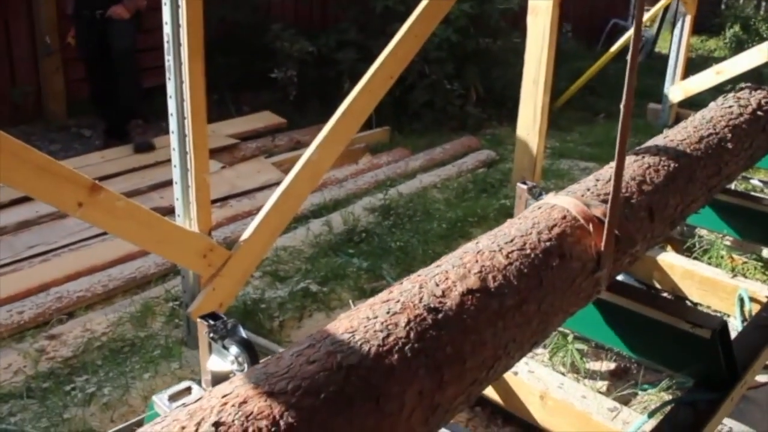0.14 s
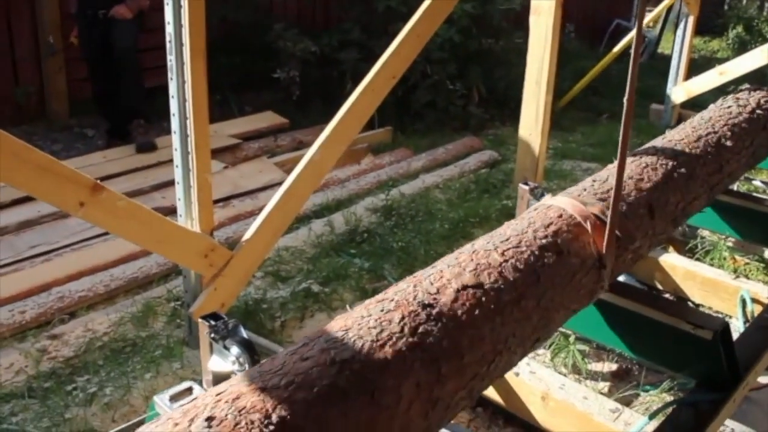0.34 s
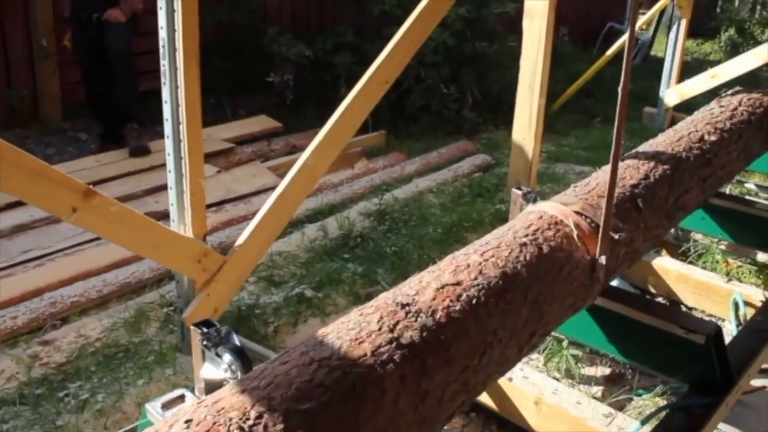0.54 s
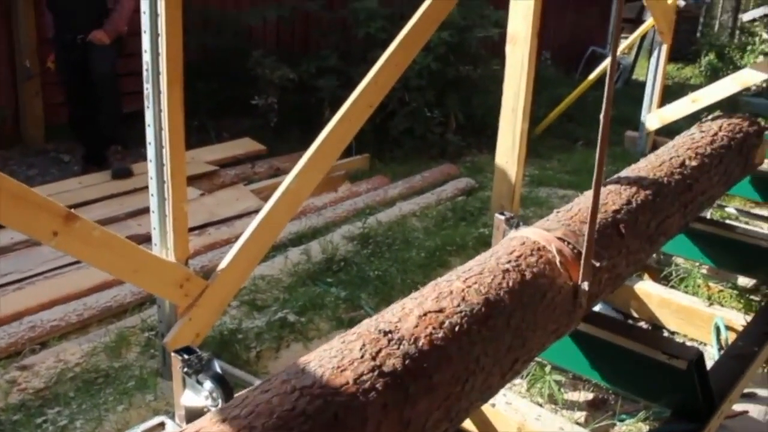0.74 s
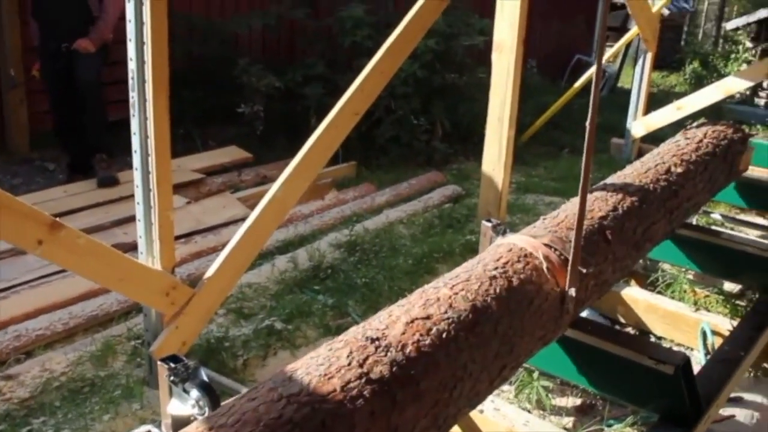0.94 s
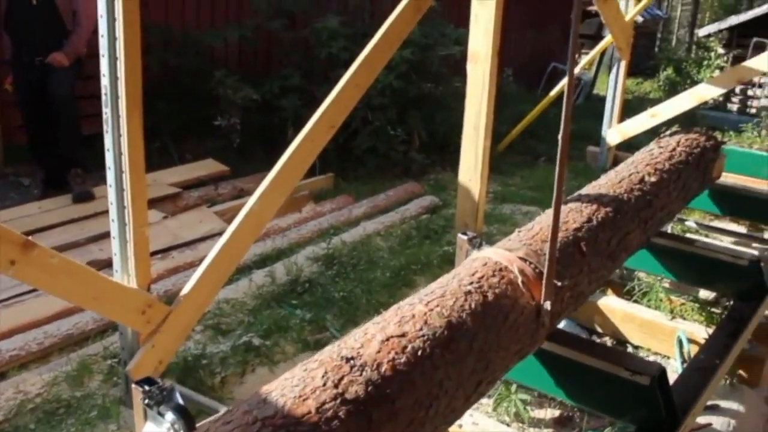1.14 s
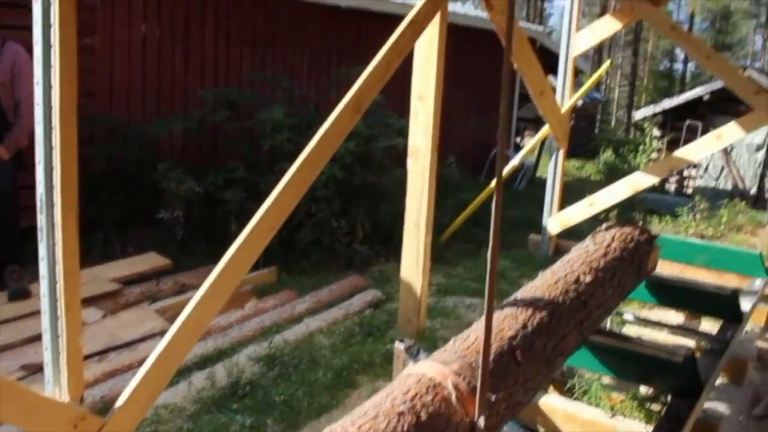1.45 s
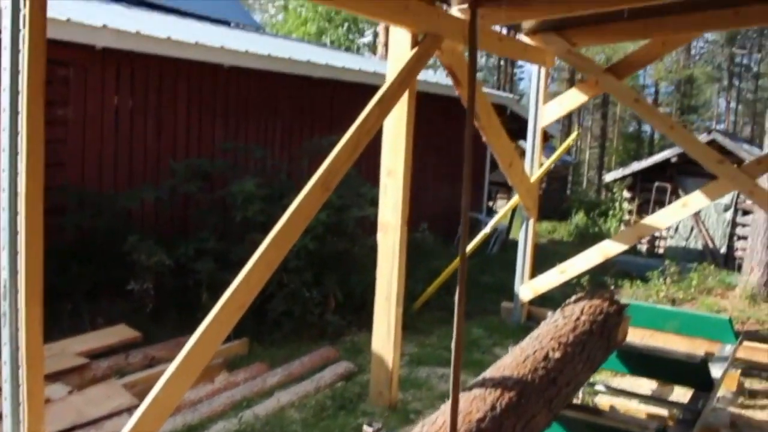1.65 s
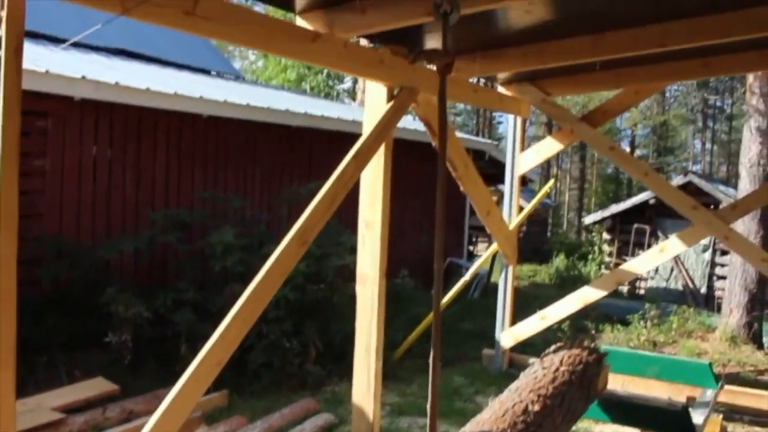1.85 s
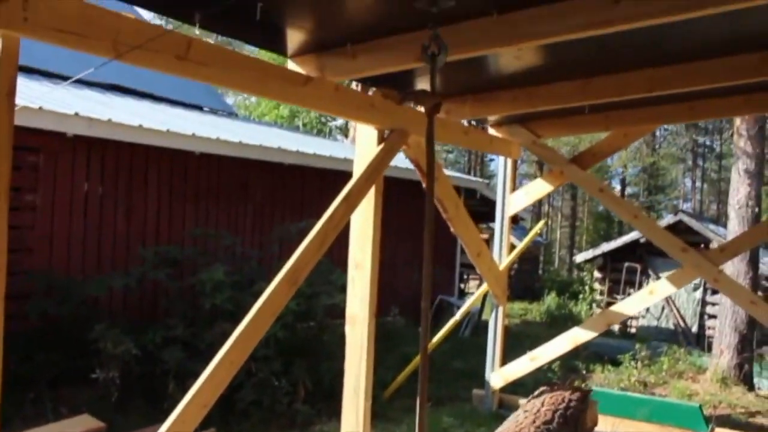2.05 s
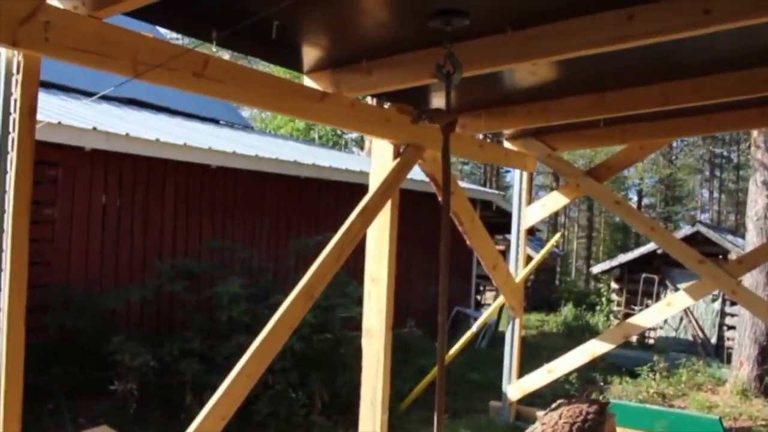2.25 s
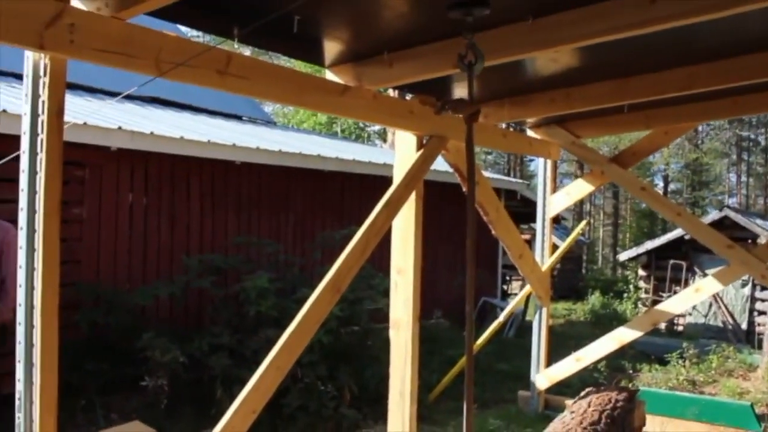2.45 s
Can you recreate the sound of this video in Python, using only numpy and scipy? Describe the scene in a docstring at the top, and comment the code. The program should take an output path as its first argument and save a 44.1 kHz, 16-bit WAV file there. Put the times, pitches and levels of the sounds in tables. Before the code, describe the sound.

Electric winch runs twice briefly, clunking on and whirring roughly, with a quiet outdoor pause between

```python
"""Under a timber roof in quiet outdoor air, an electric winch runs two short bursts.
Relay and brake clacks are bursts of noise; the cable snapping tight thumps the frame, as fading sine tones.
Gear whirr, rattle, growl and groan are streams of tiny random impacts ringing in metal and timber.
Gears and cable squeal in gliding tones, the drum settles under the brake, and deep tones ring on.
The roof answers with a fading noise echo, and shaped noise makes the hush of the air."""
import sys
import numpy as np
from scipy import signal
from scipy.fft import rfft, irfft, next_fast_len
from scipy.io import wavfile
from scipy.ndimage import uniform_filter1d, map_coordinates

SR = 44100
rng = np.random.default_rng(int(sys.argv[2]) if len(sys.argv) > 2 else 0)


def to_linear_factor(level_db):
    """Convert decibel levels (scalar or array-like) to linear amplitude factors."""
    exponent = np.asarray(level_db, float) / 20
    return 10 ** exponent


def unload_wav(signal):
    """Save mono or channel-first audio to the path in sys.argv[1] as 16-bit WAV at rate SR, clipped to [-1, 1]."""
    wavfile.write(
        sys.argv[1],
        SR,
        np.round(np.clip(np.atleast_2d(signal).T, -1, 1) * 32767).astype(np.int16),
    )


N = 112455  # length in samples
# In every table, fade_s is the time a sound takes to drop by 60 dB.


def unit(x):
    """Scale to an rms of 1."""
    return x / np.sqrt(np.mean(x ** 2) + 1e-20)


def along(points, hz):
    """Read a curve of (pitch_hz, value) points on a logarithmic pitch axis."""
    point_hz, value = np.transpose(points)
    return np.interp(np.log(hz + 1), np.log(point_hz + 1), value)


def filtered(x, response):
    """Shape the spectrum of x by a response, a function of frequency in Hz."""
    size = next_fast_len(x.shape[-1] + 8192)  # spare room lets resonances ring out
    spectrum = rfft(x, size) * response(np.fft.rfftfreq(size, 1 / SR))
    return irfft(spectrum, size)[..., :x.shape[-1]]


def wobble(rate):
    """A smooth random curve through a given number of random points a second."""
    points = rng.standard_normal(int(N * rate / SR) + 4)
    return map_coordinates(points, [np.arange(N) * rate / SR])


def patchy(x, depth_db):
    """Bands of a few hundred Hz flare and fade within some 20 ms; rms 1."""
    grid = signal.stft(x, nperseg=512, noverlap=384)[2]
    field = uniform_filter1d(rng.standard_normal(grid.shape), size=3, axis=0)  # smooth over pitch
    field = uniform_filter1d(field, size=7, axis=1)  # smooth over time
    flaring = grid * to_linear_factor(depth_db * unit(field))
    return unit(signal.istft(flaring, nperseg=512, noverlap=384)[1][:N])


def contacts(rate, spread_db, spectrum, modes, modes_db):
    """Random little impacts, coloured broadly and ringing in a set of resonances; rms 1."""
    struck = rng.random(N) < rate / SR  # on average this many a second
    hits = struck * to_linear_factor(spread_db * rng.standard_normal(N)) * rng.standard_normal(N)

    def response(f):
        """Broad colour, with resonant peaks of alternating sign added in."""
        peaks = 0
        for k, (hz, width, db) in enumerate(modes):
            peaks = peaks + (-1) ** k * to_linear_factor(db) * 1j * f * width / (hz * hz - f * f + 1j * f * width)
        return to_linear_factor(along(spectrum, f)) * (1 + to_linear_factor(modes_db) * peaks)

    return unit(filtered(hits, response))


def ringing(modes, seconds, tilt_db=0, lasting=1):
    """One blow makes each mode ring and fade; neighbours start in opposite directions."""
    t = np.arange(int(seconds * SR)) / SR
    tones = 0
    for k, (hz, db, fade) in enumerate(modes):
        level_db = db + tilt_db * np.log2(hz / 400) - 60 * t / (fade * lasting)
        tones = tones + (-1) ** k * to_linear_factor(level_db) * np.sin(2 * np.pi * hz * t)
    blow_rise_s = 0.00054  # time constant of the onset
    return (1 - np.exp(-t / blow_rise_s)) * tones


def add(track, s, sound):
    """Mix a sound into a track at a time in seconds, cut at the track's end."""
    part = track[round(s * SR):][:len(sound)]
    part += sound[:len(part)]


# How alike the air is in the two ears: pitch_hz, likeness (1 same, 0 unrelated, -1 opposite)
AIR_LIKENESS = [(60, -0.21), (180, 0.67), (550, 0.46), (1650, 0.048), (4970, 0.14), (15000, -0.26)]
# Colour of the air: pitch_hz, relative level_db
AIR_COLOUR = [(12, -40), (25, -2.5), (60, -3.5), (130, -15), (200, -10.5), (300, -8.5), (420, -12.5),
              (700, -15), (1400, -18), (5000, -25.5), (10000, -37.5), (14500, -40.5), (15600, -42),
              (15800, -93)]
# Swell of the air: time_s, level_db before the 2 dB added below
AIR_LEVEL = [(0, -49.5), (.2, -48.5), (.5, -43.5), (.62, -56), (.75, -50.5), (1.2, -49), (1.9, -51),
             (2.4, -48.5), (2.55, -50)]


def air():
    """Far outdoor hush: coloured noise, more or less alike in the two ears by pitch."""
    def mid_and_side(f):
        """Share the noise between the ears' common part and their difference."""
        turn = np.arccos(np.clip(along(AIR_LIKENESS, f), -1, 1)) / 2
        return to_linear_factor(along(AIR_COLOUR, f)) * [np.cos(turn), np.sin(turn)]

    mid, side = filtered(rng.standard_normal((2, N)), mid_and_side)
    s, db = np.transpose(AIR_LEVEL)
    level_db = np.interp(np.arange(N) / SR, s, db) + 2
    return to_linear_factor(level_db) * unit(np.array([mid + side, mid - side]))


# Deep tones of taut cable and posts: pitch_hz, loaded_db, rest_db (relative levels)
HUM_LINES = [(83.5, -10, -1.5), (100, -10.5, -5), (130.4, -7.5, -2), (163, -6.5, -30), (165.4, -39, -4.5)]
# Level of all the deep tones together: time_s, level_db
HUM_LEVEL = [(0.262, -16), (0.28, -32), (0.38, -21), (0.4, -20), (0.5, -37), (0.54, -71), (0.65, -49.5),
             (0.69, -45.5), (0.91, -49), (1.34, -47.5), (1.86, -52), (1.87, -55), (1.96, -45),
             (1.969, -18.5), (1.99, -25.5), (2.08, -23), (2.12, -34), (2.17, -28), (2.33, -30), (2.36, -55),
             (2.39, -40), (2.55, -37.5)]


def hum():
    """Deep steady-pitched lines, whose balance shifts when the cable is loaded and they grow loud."""
    t = np.arange(N) / SR
    s, db = np.transpose(HUM_LEVEL)
    level_db = np.interp(t, s, db, left=-120)
    loaded_over_db = -44  # at this level the balance is halfway
    load = np.clip((level_db - loaded_over_db) / 6 + .5, 0, 1)
    lines = np.zeros(N)
    for hz, loaded_db, rest_db in HUM_LINES:
        balance = load * to_linear_factor(loaded_db) + (1 - load) * to_linear_factor(rest_db)
        tone = np.sin(2 * np.pi * (hz * t + rng.random()))
        lines += balance * to_linear_factor(1.5 * wobble(7.12)) * tone
    return to_linear_factor(level_db) * lines


# Echo of the roof and sheds: pitch_hz, fade_s
ROOF_FADE = [(150, 0.23), (1500, .35), (8000, 0.15)]


def roof(x):
    """The roof and sheds answer with a fading wash, different in each ear, highs and lows fading apart."""
    hz, t, grid = signal.stft(rng.standard_normal((2, SR // 2)), SR, nperseg=256)
    fading = grid * to_linear_factor(-60 * t / along(ROOF_FADE, hz)[:, None])
    tail = signal.istft(fading, SR, nperseg=256)[1]
    late = np.pad(x, (300, 0))[None]  # samples of delay
    return signal.fftconvolve(late, tail / np.linalg.norm(tail[0]), axes=1)[:, :N]


# Difference between the ears: pitch_hz, level_db before the 3 dB added below
WINCH_WIDTH = [(60, -12), (150, -9), (380, -16), (950, -11.5), (2380, -8), (5980, -3), (15000, 4)]


def spread(x):
    """The wide machine reaches the two ears by different short paths, from parts that keep shifting."""
    n = np.arange(1500)
    paths = rng.standard_normal(1500) * to_linear_factor(-60 * n / 1500)
    moved = signal.fftconvolve(x, paths / np.linalg.norm(paths))[:N]
    shifting = .55  # share of the difference that wavers
    moved = moved * (1 - shifting + shifting * wobble(110))
    side = filtered(moved, lambda f: to_linear_factor(along(WINCH_WIDTH, f) + 3.0))
    return np.array([x + side, x - side])


# Drum settling when the brake grips: start_s, rise_s, grip_s (from the start until fading begins)
DRUM_SETTLE = (2.2265, 0.0075, 0.039)
# Modes of the drum: pitch_hz, level_db (wavers), fade_s
DRUM_MODES = [(240.4, -30, 0.21), (495, -28, 0.15), (644, -22.5, 0.085), (892.6, -28, .25),
              (1000, -31, .06), (1310, -32, 0.05), (1590, -36, .2), (2210, -44, 0.14), (2894, -40, .06),
              (4260, -35, .08), (4650, -41.5, .06)]


def settle():
    """The brake judders on the drum, whose modes waver in level and phase and die away after the grip."""
    start, rise, grip = DRUM_SETTLE
    out = np.zeros(N)
    t = np.arange(SR // 3) / SR
    judder_rad = 1.3
    for hz, db, fade in DRUM_MODES:
        level_db = db + 3 * wobble(90)[:len(t)] - 60 * np.clip(t - grip, 0, 1) / fade
        phase = 2 * np.pi * hz * t + judder_rad * wobble(90)[:len(t)]
        add(out, start, to_linear_factor(level_db) * np.clip(t / rise, 0, 1) * np.sin(phase))
    return out


# Start of each squeal: start_s
SQUEAL_STARTS = [.425, .44, .47, .47, .475, .505, .51, .52, .535, .56, 2.038, 2.038, 2.04, 2.07, 2.075,
                 2.08, 2.1]
# Brief rough squeals of gears and cable: length_s, first_hz, last_hz, level_db (pitch and level waver)
SQUEAL_GLIDES = [(0.032, 3900, 3640, -31), (.04, 5500, 5300, -26), (0.048, 2913, 3033, -20.5),
                 (0.023, 3730, 4900, -34), (0.052, 5900, 6700, -27), (0.013, 513, 530, -25.5),
                 (0.096, 4330, 4500, -28), (0.075, 2900, 3010, -25), (0.048, 5800, 5400, -25.5),
                 (0.079, 780, 790, -24), (.03, 2800, 2760, -33), (0.027, 4200, 4500, -32),
                 (0.035, 4420, 4800, -29.5), (.04, 3800, 3830, -29), (0.037, 1500, 1950, -25.5),
                 (0.082, 2700, 2600, -27.5), (0.028, 5400, 6160, -31)]


def squeals():
    """Gears and cable squeal: gliding tones of wavering pitch and level that swell and fade."""
    out = np.zeros(N)
    jitter, flutter_db = .015, 4  # share of the pitch, dB
    for start, (length, first_hz, last_hz, db) in zip(SQUEAL_STARTS, SQUEAL_GLIDES):
        u = np.linspace(0, 1, round(length * SR))
        hz = first_hz + (last_hz - first_hz) * u
        hz = hz * (1 + jitter * wobble(506)[:len(u)])
        level = to_linear_factor(db + flutter_db * wobble(200)[:len(u)])
        swell = np.sin(np.pi * u) ** .5
        add(out, start, level * swell * np.sin(2 * np.pi * np.cumsum(hz) / SR))
    return out


# Relay and brake clacks: start_s, level_db (before the envelope), hold_s (until fading begins),
# fade_s, tilt in dB per octave
CLACK_HITS = [(.2, -15, 0.0073, 0.15, .5), (0.2108, -13, 0.0014, 0.026, 1), (.256, -9, 0.003, 0.049, -5),
              (.935, -44, 0.0086, 0.082, -3), (1.924, -29, 0.0015, .05, -8.5),
              (1.93, -12.5, 0.0048, 0.13, 0), (1.936, -15, 0.0018, 0.054, 2),
              (1.974, -15.5, .008, 0.039, 2), (2.2258, -15, .0015, 0.051, -1.5)]
# Colour all clacks share before their tilt: pitch_hz, relative level_db
CLACK_COLOUR = [(88, -52), (150, -34), (239, -13), (1090, -8), (1240, -2.5), (2230, -9.5), (5130, -14),
                (11800, -41.5), (13300, -63.5), (15500, -50)]


def clacks():
    """Metal parts strike: short gritty noise bursts that start abruptly, swell briefly and fade."""
    out = np.zeros(N)
    t = np.arange(SR // 4) / SR
    for start, db, hold, fade, tilt in CLACK_HITS:
        grit = rng.standard_normal(len(t)) * to_linear_factor(2 * rng.standard_normal(len(t)))
        colour = lambda f: to_linear_factor(along(CLACK_COLOUR, f) + tilt * np.log2((f + 50) / 2000))
        grit = unit(filtered(grit, colour))
        swell = np.clip(0.43 + 0.28 * t / hold, 0, 1)
        add(out, start, to_linear_factor(db) * grit * swell * to_linear_factor(-60 * np.clip(t - hold, 0, 1) / fade))
    return out


# Moments when the cable snaps tight: start_s
SNAP_STARTS = [.2541, .2562, .2608, 1.9876]
# Each snap: level_db, tilt in dB per octave, ring length as a factor on the frame's fade_s
SNAP_BLOWS = [(-13, 2.5, 0.82), (-18, -3, 0.63), (-22, 1.5, .8), (-10, 1, 0.53)]
# Modes of the timber frame: pitch_hz, relative level_db, fade_s (before that factor)
FRAME_MODES = [(124, -21, 0.6), (154.8, -5.5, 0.44), (252.7, -7.5, 0.17), (423, -3, 0.13),
               (520, -1.5, 0.094), (770, 1.5, 0.052), (1056, 2, 0.059), (1330, -13.5, .1),
               (1566, -1, 0.053), (1740, -9.5, 0.1), (2045, -8, 0.1)]
# The cable's own twang: start_s, pitch_hz, level_db
CABLE_TWANGS = [(.2541, 426.6, -8), (1.9873, 498, -4)]


def snaps():
    """The cable jerks tight, twangs on a single tone and knocks the frame's modes into ringing."""
    out = np.zeros(N)
    for start, (db, tilt_db, lasting) in zip(SNAP_STARTS, SNAP_BLOWS):
        add(out, start, to_linear_factor(db) * ringing(FRAME_MODES, .4, tilt_db, lasting))
    twang_fade_s = .12
    for start, hz, db in CABLE_TWANGS:
        add(out, start, ringing([(hz, db, twang_fade_s)], .3))
    return out


# Motor levels, a list of rows per burst: time_s, whirr_db, fizz_db (over the whirr), rattle_db,
# growl_db, groan_db
MOTOR_BURSTS = [
    [(0.27, -45, -22, -16, -19, -7.5), (0.296, -59, -35, -34, -31, -21.5),
     (0.368, -46, -12, -28.5, -30, -21.5), (0.382, -48, 4, -22.5, -21.5, -29),
     (0.416, -41, -16, -26.5, -33.5, -23.5), (0.43, -24, -9, -30, -28, -33),
     (0.44, -28.5, -5, -22, -29, -24.5), (0.48, -15.5, -14, -30.5, -33.5, -32),
     (0.522, -18, -16, -24.5, -25, -42), (0.552, -20, -16, -26.5, -31.5, -47),
     (0.58, -19.5, -17.5, -24.5, -27.5, -38), (0.61, -32.5, -11, -31.5, -30.5, -40),
     (0.648, -39.5, -18.5, -37.5, -31.5, -35), (0.82, -54.5, -25, -52, -56.5, -51),
     (0.922, -64, -22, -56.5, -53, -53.5), (0.94, -49, -34, -56, -53, -57), (0.97, -66, -5, -50, -50, -51),
     (1.05, -63, -12, -65, -60, -54)],
    [(2.0, -35, 0, -16, -12.5, -14), (2.032, -67, -23, -43, -32.5, -26), (2.046, -27, -11, -36, -34, -22),
     (2.066, -22.5, -14, -29, -33, -28), (2.092, -18.5, -15, -27.5, -38.5, -36),
     (2.14, -26.5, -14, -35, -43, -42), (2.154, -28.5, -15.5, -49, -41, -38.5),
     (2.218, -47.5, -22, -46, -50, -42), (2.228, -29.5, -17, -28, -35, -36),
     (2.236, -28, -5.5, -28, -21, -30), (2.26, -37.5, -11, -32, -25.5, -25.5),
     (2.29, -42.5, -17, -47, -40.5, -39.5), (2.348, -53.5, -24, -48, -46.5, -46.5),
     (2.502, -59.5, -16, -57, -53.5, -47), (2.55, -60, -20, -54, -61, -58)],
]
# Colours of the sounds: pitch_hz, relative level_db
WHIRR_COLOUR = [(880, -20.5), (1500, -8), (2000, -5), (2950, -0.5), (4400, -3.5), (5600, -6), (6600, -10.5),
                (7200, -19), (9100, -29), (15400, -120)]
FIZZ_COLOUR = [(4120, -30), (7000, -1), (11500, -7.5), (14600, -23), (15300, -40), (15500, -75)]
RATTLE_COLOUR = [(500, -42), (950, 9.5), (1900, 0), (2700, -12.5), (6000, -41)]
GROWL_COLOUR = [(250, -25), (450, 4.5), (900, 3), (1400, -35.5)]
GROAN_COLOUR = [(100, -19), (190, 12.5), (270, 4.5), (400, 3), (600, -96)]
# Resonances of gear housing, loose parts and frame (growl, groan): pitch_hz, width_hz, relative level_db
HOUSING_MODES = [(1870, 15, 9), (2110, 35, 2.5), (2314, 29, 0), (2900, 73, 3.5), (3190, 8, -9),
                 (3680, 62, -3), (3705, 130, 1.5), (4490, 23, 5), (4580, 41, -2), (5930, 780, -24)]
LOOSE_MODES = [(1032, 56, -7.5), (1208, 17, 3.5), (1349.4, 43, 3), (1445, 46, 5), (1666, 74, -7)]
FRAME_GROWL_MODES = [(508, 41, 0), (609, 39, -3), (694.2, 55, -3), (776.3, 28, -1)]
FRAME_GROAN_MODES = [(209.3, 6.7, -8), (253, 21.4, 5), (296.3, 60, 1), (330, 60, 0.5)]
# Steel rung by the loose parts and the growl: pitch_hz, relative level_db, fade_s
STEEL_MODES = [(528, -9.5, 0.28), (580, -6, 0.35), (680.4, -2, 0.28), (781, -3, 0.41), (820, -6, .7),
               (886, -4, 0.26), (634, -10, 0.83), (1178, -4, 0.47), (1324, -8.5, 0.55), (1455, 4.5, .3),
               (1560, -8, .4), (2096, 6.5, 0.41)]


def motor():
    """Gear teeth whirr in the housing, loose parts rattle, the loaded frame growls and groans, steel rings."""
    t = np.arange(N) / SR
    levels = np.zeros((5, N))
    for rows in MOTOR_BURSTS:
        s, whirr_db, fizz_db, *low_db = np.transpose(rows)
        fade_in = np.clip((t - s[0]) / .01, 0, 1)
        fade_out = np.clip((s[-1] + .05 - t) / .05, 0, 1)
        curves = (whirr_db, whirr_db + fizz_db, *low_db)
        levels += fade_in * fade_out * to_linear_factor([np.interp(t, s, db) for db in curves])
    whirr = patchy(contacts(6000, 1.8, WHIRR_COLOUR, HOUSING_MODES, modes_db=1), depth_db=3)
    fizz = patchy(contacts(8000, 1.8, FIZZ_COLOUR, [], modes_db=0), depth_db=3)
    rattle = patchy(contacts(3000, 3, RATTLE_COLOUR, LOOSE_MODES, modes_db=3), depth_db=2)
    growl = contacts(3000, 1.25, GROWL_COLOUR, FRAME_GROWL_MODES, modes_db=8.5)
    groan = contacts(2000, 1.3, GROAN_COLOUR, FRAME_GROAN_MODES, modes_db=12.5)
    whirr, fizz, rattle, growl, groan = levels * [whirr, fizz, rattle, growl, groan]
    loose = rattle + growl
    steel = ringing(STEEL_MODES, 0.72)
    rung = signal.fftconvolve(loose, steel / np.linalg.norm(steel))[:N]
    return whirr + fizz + groan + loose + to_linear_factor(-15.5) * rung


def scene():
    """The winch under its roof, in the open air."""
    winch = motor() + squeals() + clacks() + snaps() + settle()
    return spread(winch) + to_linear_factor(-21.5) * roof(winch) + hum() + air()


def low_pass(x):
    """Removes everything above the highest recorded frequency."""
    return signal.sosfilt(signal.butter(12, 15760, fs=SR, output="sos"), x)


def record(dry):
    """Peaks near full scale are rounded off softly."""
    clip_top = 1.0  # full scale
    mix = dry / (1 + np.abs(dry / clip_top) ** 6) ** (1 / 6)
    return low_pass(mix)


dry = scene()
out = record(dry)
unload_wav(out)
```